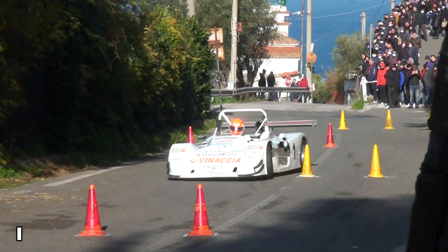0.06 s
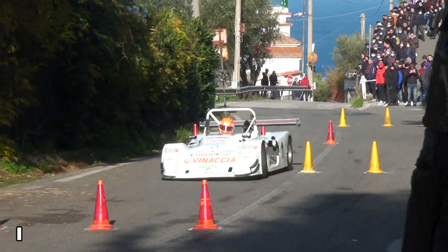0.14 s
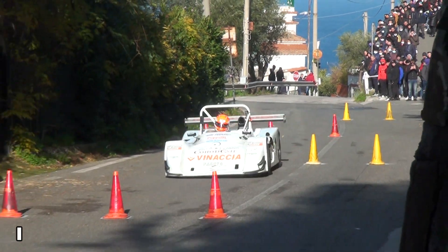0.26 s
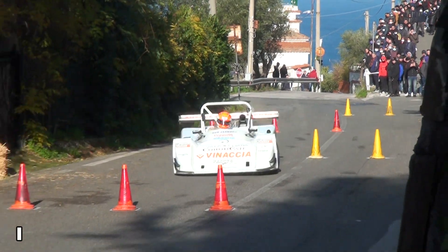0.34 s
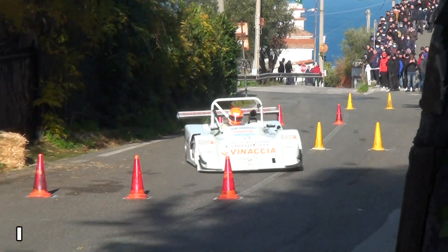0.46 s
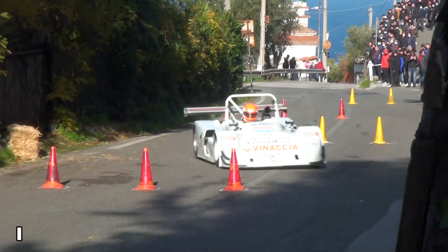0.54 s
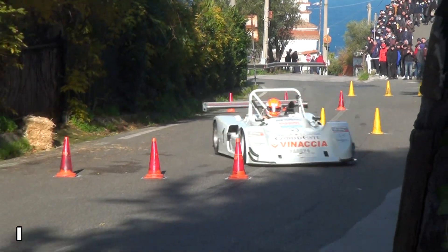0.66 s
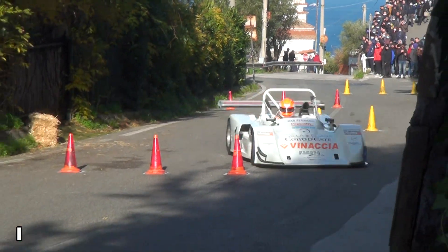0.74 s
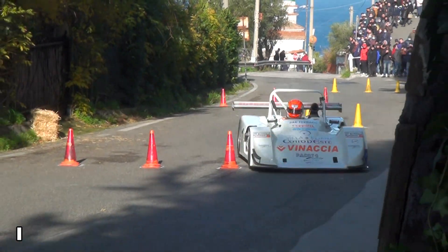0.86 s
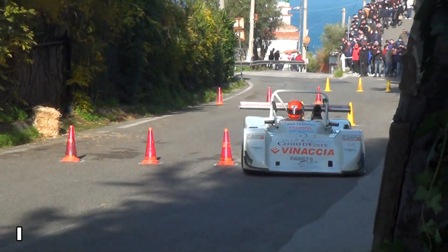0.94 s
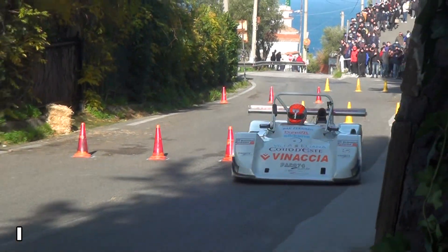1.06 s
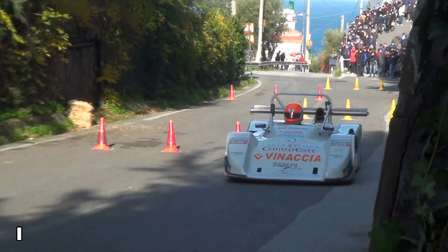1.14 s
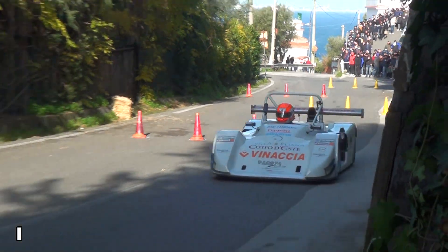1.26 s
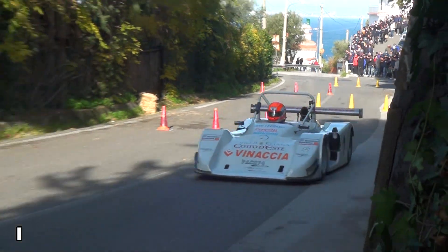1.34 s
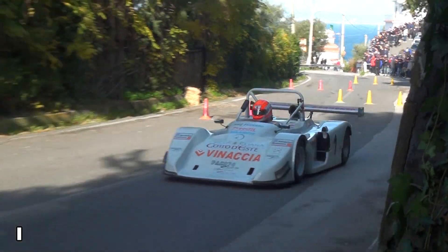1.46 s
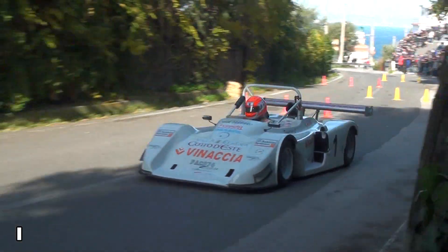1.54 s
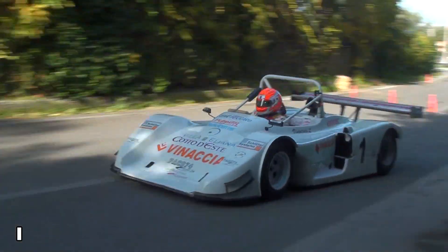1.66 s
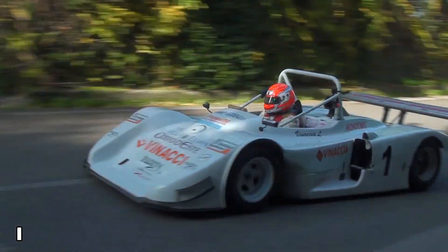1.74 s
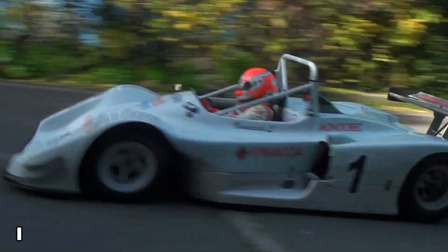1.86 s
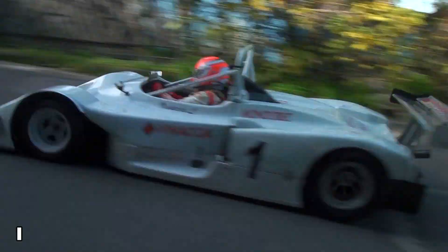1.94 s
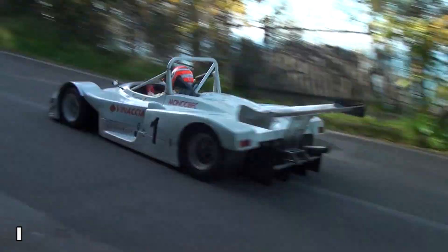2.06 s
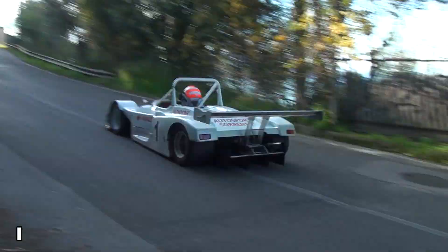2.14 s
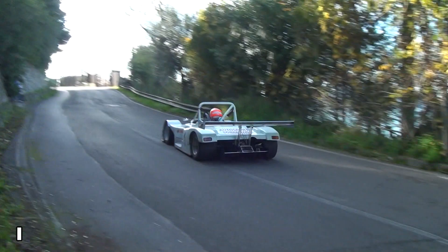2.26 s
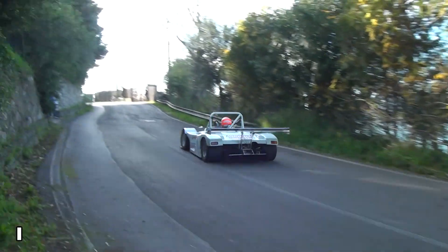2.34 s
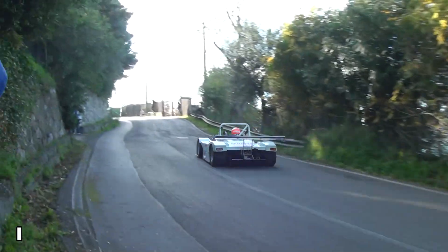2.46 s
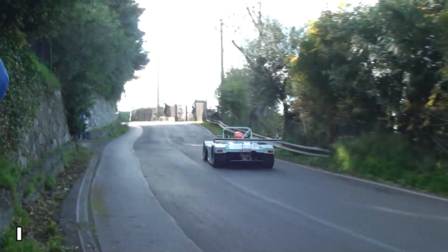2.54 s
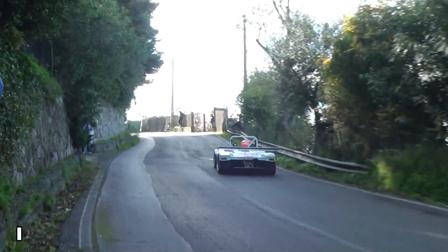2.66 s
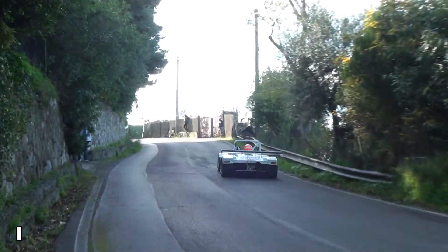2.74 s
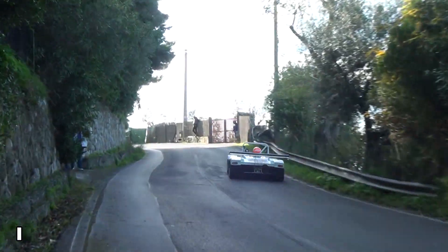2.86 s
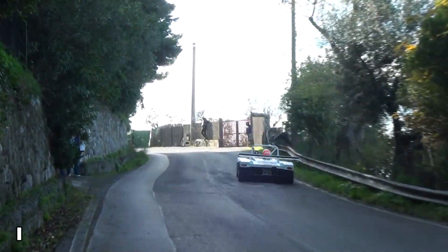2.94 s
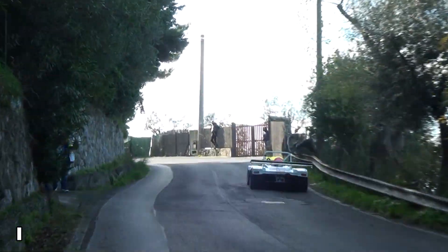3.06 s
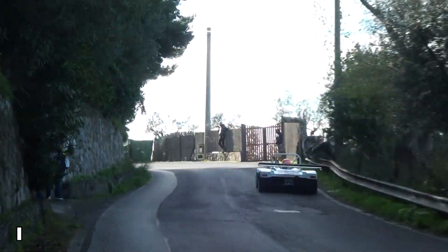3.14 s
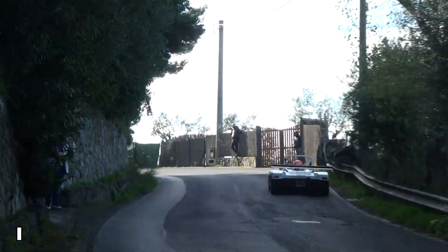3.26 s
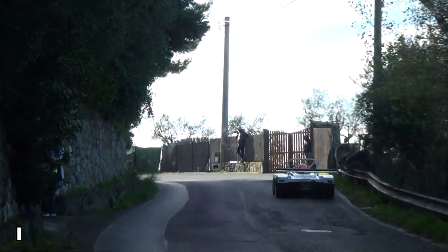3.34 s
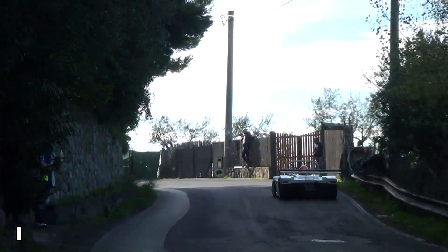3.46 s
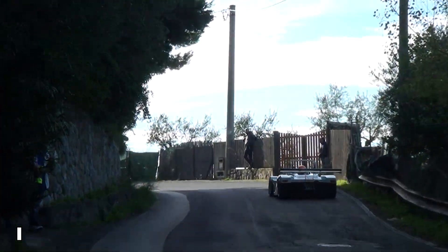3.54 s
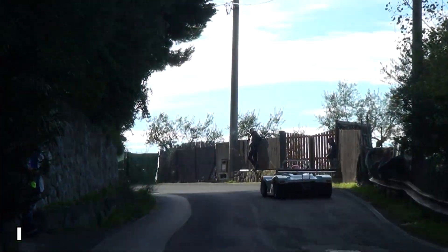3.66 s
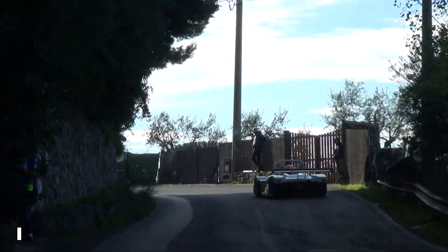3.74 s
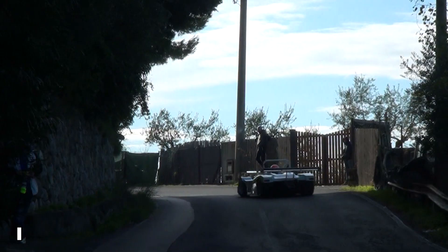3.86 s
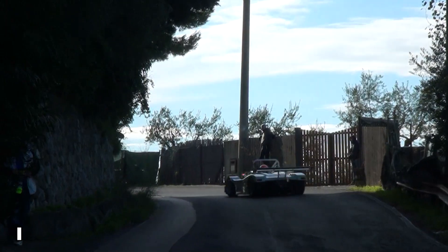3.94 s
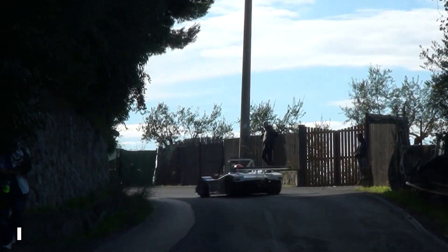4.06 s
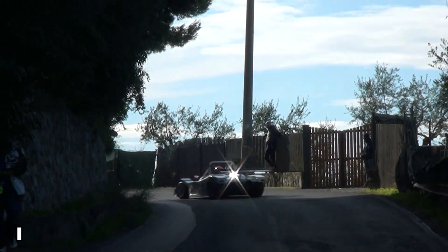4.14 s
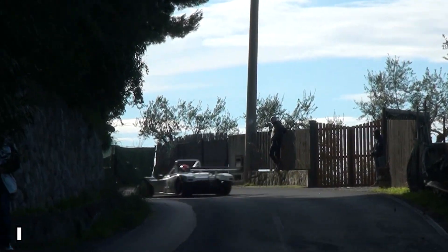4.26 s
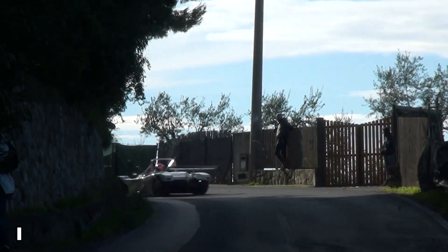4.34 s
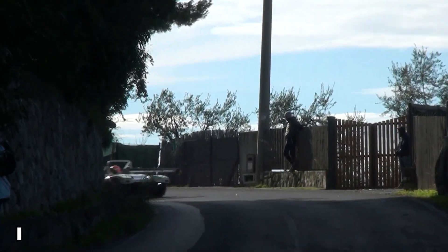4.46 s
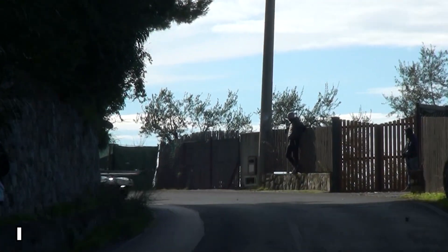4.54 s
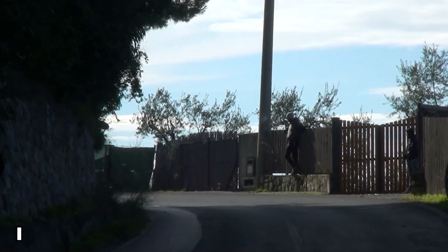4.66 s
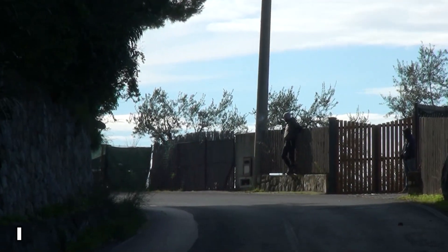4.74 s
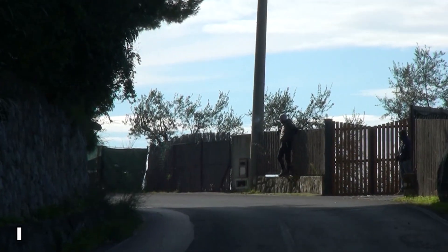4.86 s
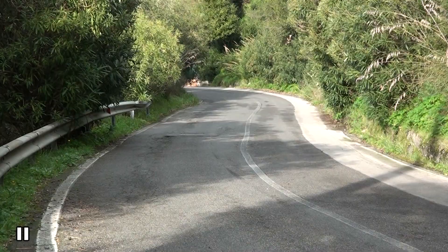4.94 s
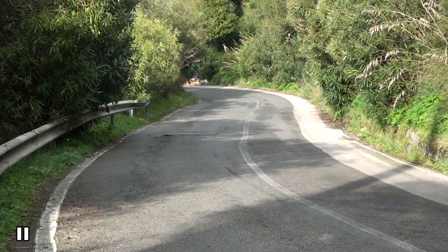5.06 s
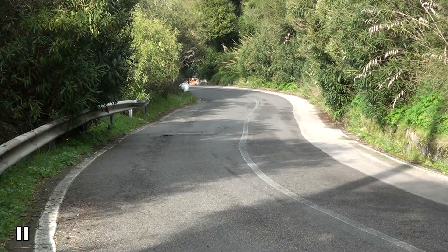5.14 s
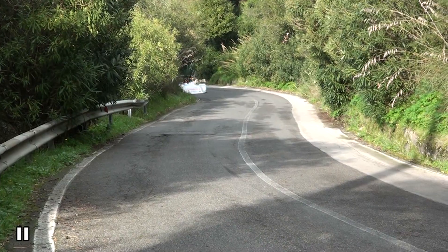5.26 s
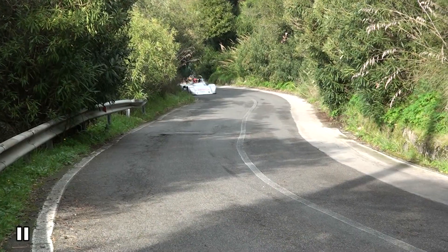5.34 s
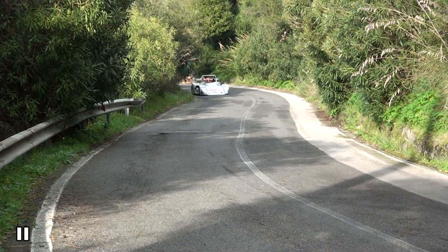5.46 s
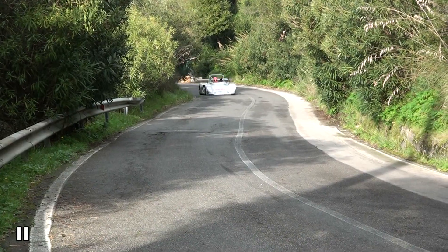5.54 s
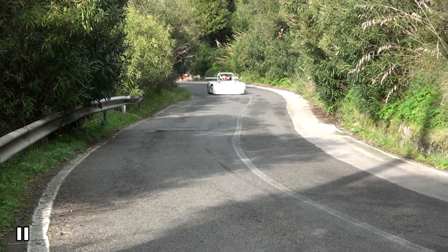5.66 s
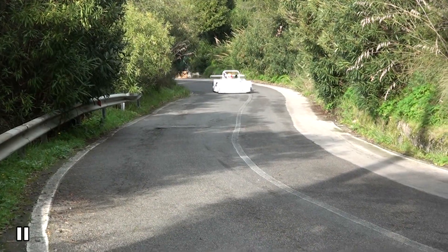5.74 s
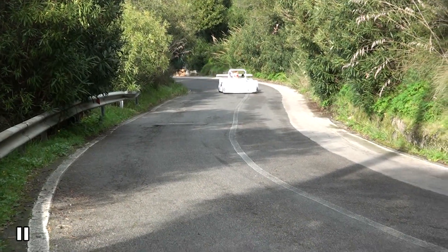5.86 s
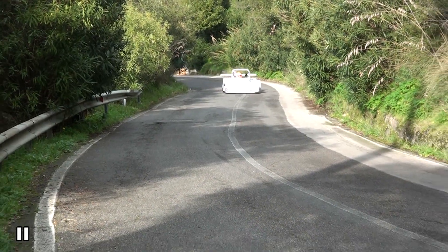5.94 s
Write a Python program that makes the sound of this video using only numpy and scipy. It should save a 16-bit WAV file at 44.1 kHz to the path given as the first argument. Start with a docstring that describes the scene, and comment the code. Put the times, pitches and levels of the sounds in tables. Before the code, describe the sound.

A hill-climb racing car is heard outdoors from the roadside. From 0 to 0.9 s it approaches, its four-cylinder note burbling and wavering around a middling pitch, with faint straight-cut gear whine, low gusty thuds and wall echoes. From about 0.9 s the revs climb steadily, growing louder and raspier, until it roars by at 2.2 s, very close and overloading the microphone. The pitch drops sharply, a brief low wake buffet follows at 2.3 s, and the exhaust pulls away with a hollow, brassy howl, rising until 3 s. Then it wavers and falls; booming backfires and sharp cracks burst around 3.4-3.6, 3.9 and 4.1 s, with smaller pops to 4.7 s as throttle blips fade round the bend. At 4.95 s an abrupt cut: a distant, thinner engine at much higher revs, fluttering and echoing, dipping near 5.4 s and rising again until 6 s.

```python
"""A four-cylinder hill-climb racer comes on weaving, its gears whining, and roars past within a few metres.
As it passes it buffets and overloads the microphone; then it lifts off, backfires and pulls away round a bend.
The scene jumps to a far stretch of road, where the car comes on at high revs.
Note, burble and pressure fronts follow one crankshaft phase; gas noise puffs with it; walls and banks echo."""
import sys
import numpy as np
from scipy import signal
from scipy.fft import rfft, irfft, next_fast_len
from scipy.io import wavfile
from scipy.ndimage import uniform_filter1d

SR = 44100
rng = np.random.default_rng(int(sys.argv[2]) if len(sys.argv) > 2 else 0)


def file_out(sig):
    """Save sig as 16-bit WAV at sys.argv[1]."""
    # one column per channel
    cols = np.atleast_2d(sig).T
    # limit, then scale
    lim = np.clip(cols, -1, 1)
    pcm = np.round(lim * 32767).astype(np.int16)
    wavfile.write(sys.argv[1], SR, pcm)


N = 265041
TIME = np.arange(N) / SR   # s
BINS = np.maximum(np.fft.rfftfreq(next_fast_len(N, True), 1 / SR), 1)   # Hz
JUMP_S = 4.949   # moment at which the scene jumps to the far stretch of road


def from_db(db):
    """Decibels to gain."""
    return 10 ** (np.asarray(db) / 20)


def rms_one(x):
    """Scale to unit power."""
    return x / np.sqrt(np.mean(x ** 2) + 1e-20)


def in_time(rows):
    """Each column of a curve table, sample by sample."""
    s, *columns = np.transpose(rows)
    return np.array([np.interp(TIME, s, c) for c in columns])


def across_jump(near, far):
    """The near stretch of road, then within milliseconds the far one."""
    share = np.clip((TIME - JUMP_S) / .004 + .5, 0, 1)
    return (1 - share) * near + share * far


def at_hz(points, hz):
    """Read a table on a log-frequency axis."""
    f, value = np.transpose(points)
    return np.interp(np.log(hz), np.log(f), value)


def colour(points, hz):
    """Gain of a spectrum that falls 30 dB per octave beyond its ends."""
    beyond = np.abs(np.log2(hz / np.clip(hz, points[0][0], points[-1][0])))
    return from_db(at_hz(points, hz) - 30 * beyond)


def filtered(x, response):
    """Apply a frequency response."""
    size = next_fast_len(N, True)
    return irfft(rfft(x, size) * response, size)[..., :N]


def drift(rate_hz):
    """Smooth random wander of about unit rms, drawn at every 40th sample; a higher rate wanders faster."""
    step = 40
    r = np.exp(-2 * np.pi * rate_hz * step / SR)
    settle = 2000   # drop the filter's start
    slow = signal.lfilter([1], [1, -2 * r, r * r], rng.standard_normal(N // step + settle + 2))[settle:]
    return np.interp(np.arange(N) / step, np.arange(len(slow)), rms_one(slow))


# Left-right likeness of the noise. Each row: frequency in Hz, correlation 0-1.
LIKENESS = [(40, 0), (250, 0.98), (700, 1), (1500, 1), (3000, 1), (7000, 0.9), (15000, 0.96)]


def turbulence(spectrum, gate=1):
    """Gas rushing unsteadily: gated stereo noise of a given colour and unit power, its sides alike by frequency."""
    alike = np.clip(at_hz(LIKENESS, BINS), 0, 1)
    noise = gate * rng.standard_normal((2, N))
    mid, side = filtered(noise, colour(spectrum, BINS) * np.sqrt([1 + alike, 1 - alike]))
    return rms_one(np.array([mid + side, mid - side]))


# Side of the car turned to the microphone. Each row: time in seconds, side (0 nose, 1 front corner, 2 flank,
# 3 rear corner, 4 tail, 5 rear quarter in the bend; more counts as 5).
ASPECT = [(0, 0), (1.15, 0.45), (1.45, 1), (1.8, 1.1), (1.9, 1.5), (2.0, 2.5), (2.19, 2), (2.26, 3),
          (2.36, 3), (2.55, 3.5), (2.85, 4), (3.6, 4), (4.15, 5), (4.94, 8)]


def side_shown():
    """From nose 0 to rear quarter 5; on the far stretch the car comes nose first."""
    return across_jump(np.clip(in_time(ASPECT)[0], 0, 5), 0)


# How each layer carries. Each entry: base level in dB at the nearest point, power of distance by which it falls,
# extra dB behind the car, base level in dB on the far stretch, its rise there in dB per second.
CARRY = { "note": (1, 1.2568, 0.5, -10.5, -1.5), "burble": (-9, 1.23, -1, -21, 5),
         "rasp": (-6, 1.5764, 2, -19.5, -0.5), "hiss": (-7.5, 2, 1.5, -38.5, 8.5),
         "fizz": (-19.5, 2.5, 0.5, -62.5, 0.5), "rumble": (-22, 3, -12.5, -42, -10.5), }
PASS_S, SPEED_M_PER_S, NEAREST_M = 2.231, 18.34, 6.64   # moment of nearest approach, road speed, distance then


def carried_db(layer):
    """A layer swells and fades with the distance of the passing car; on the far stretch it drifts steadily."""
    nearest_db, falloff, behind_db, far_db, rise_db_per_s = CARRY[layer]
    distance_m = np.hypot(NEAREST_M, SPEED_M_PER_S * (TIME - PASS_S))
    near_db = nearest_db - falloff * 20 * np.log10(distance_m / NEAREST_M)
    near_db = near_db + behind_db * np.clip(side_shown() - 3, 0, 1)
    return across_jump(near_db, far_db + rise_db_per_s * (TIME - JUMP_S))


# Throttle moves, with low wind gusts and thuds at the same moments. Each row: start and end of the hold in seconds,
# then the change in dB of the note, of the gas noise, of uneven firing, of the gusts and thuds.
MOVES = [(0, 0.124, 2, -1, 8, 46.5), (0.182, 0.284, -2.5, 0.5, 1, 21.5), (0.313, 0.573, -1, 2.5, 3.5, 25),
         (0.63, 0.869, -0.5, -1.5, -0.5, 9), (0.928, 1.213, 1.5, 3, -8, -17),
         (1.365, 1.76, -2.5, -1, -5.5, -18), (1.899, 2.186, 7.5, 4, -3, 10.5),
         (2.273, 2.287, 4.5, -6.5, -8.5, -11), (2.345, 2.586, 7, 3, -3.5, -6),
         (2.624, 3.005, 5.5, 1, -0.5, -4), (3.072, 3.116, -0.5, 1, 3.5, 16), (3.277, 3.523, 0, -1, -11, 17),
         (3.555, 3.596, -4, 5, 1, 4), (3.66, 3.88, -3.5, 2.5, -16, -13), (3.926, 3.93, -9, 3.5, 0, 25),
         (3.96, 4.143, -8, -2, -1, 19), (4.294, 4.414, -3.5, -2, -0.5, -12), (4.511, 4.562, 3.5, 5, -3, -3),
         (4.613, 4.666, 4, 11.5, -4, -1), (4.715, 4.73, 1.5, 3.5, -3, 0), (4.781, 4.95, -5, 1.5, -3, 0),
         (4.951, 5.041, 2, -1.5, -9, 0.5), (5.11, 5.28, 1, 0.5, -6, 6), (5.347, 5.577, -5, 1, 0.5, 17.5),
         (5.65, 6.01, -2, 0.5, -8.5, 8)]
MOVE_S = 0.051   # time a change takes to set in or let go


def throttle_and_gusts():
    """Each change sets in, holds and lets go: dB of note, gas noise, uneven firing, and gusts and thuds."""
    out = 0
    for start, end, *change_db in MOVES:
        held = np.clip(1 + np.minimum(TIME - start, end - TIME) / MOVE_S, 0, 1)
        same_stretch = (TIME < JUMP_S) == (start < JUMP_S)
        out = out + np.outer(change_db, held * same_stretch)
    return out


# Engine speed on the near and the far stretch. Each row: time in seconds, firing rate in Hz with Doppler shift.
REVS = [(0, 169.6), (.12, 149.9), (.2, 155.5), (.42, 152.1), (.63, 155.9), (.88, 153.7), (.94, 177.7),
        (1.07, 172.1), (1.31, 189.9), (1.58, 225.6), (1.7, 229), (1.8, 246.4), (1.87, 258), (1.93, 254.9),
        (1.99, 264.3), (2.04, 277.4), (2.09, 264.3), (2.14, 261.1), (2.19, 276.1), (2.225, 270.5),
        (2.26, 244.6), (2.31, 226.7), (2.36, 226.4), (2.43, 220.2), (2.6, 236.2), (2.79, 244.2),
        (3.0, 256.2), (3.045, 248.2), (3.08, 226.1), (3.115, 222), (3.19, 253.6), (3.34, 221.9),
        (3.57, 229.4), (3.67, 204), (3.85, 178.2), (3.9, 191.2), (4.11, 189), (4.21, 208.4), (4.38, 194.9),
        (4.56, 202.3), (4.69, 213.5), (4.77, 202.6), (4.94, 207)]
FAR_REVS = [(4.95, 311), (5.04, 300.9), (5.1, 310.7), (5.17, 294.7), (5.23, 288.4), (5.27, 298.6),
            (5.31, 299.7), (5.37, 278.8), (5.5, 283.7), (5.63, 294), (5.7, 310), (5.74, 295), (5.8, 302.7),
            (5.9, 292.3), (6.01, 311)]


def crankshaft(jitter_rad=.045):
    """Firing rate in Hz and the slightly jittery phase, one turn a firing, that every engine layer follows."""
    firing_hz = across_jump(in_time(REVS)[0], in_time(FAR_REVS)[0])
    return firing_hz, 2 * np.pi * np.cumsum(firing_hz) / SR + jitter_rad * drift(69)


def roadside(x, fade_s=0.23, dull_hz=2500):
    """Walls, trees and banks scatter a short dull tail, different at either side."""
    age = np.arange(SR // 4) / SR
    # falls 30 dB in fade_s and starts after 6 ms
    tail = rng.standard_normal((2, len(age))) * from_db(-30 * age / fade_s) * (age > .006)
    tail = tail / np.sqrt(np.sum(tail ** 2, axis=1, keepdims=True))
    return filtered(x, rfft(tail, next_fast_len(N, True)) / np.sqrt(1 + (BINS / dull_hz) ** 4))


# Colour of the echo from the wall and gate at the bend. Each row: frequency in Hz, gain in dB.
GATE_COLOUR = [(700, -15), (1100, -6), (1550, -4), (2400, -15)]
GATE_AT_S, GATE_SPREAD_S = 3.39, 0.12   # when it is strongest, spread of its bell-shaped swell
GATE_DELAY_S, GATE_CLOSING_S_PER_S = .195, 0.069   # its delay then, and how fast that shrinks


def gate_echo(x):
    """The wall ahead returns the upper partials late, and sharp, because the car is closing on it."""
    delay_s = GATE_DELAY_S - GATE_CLOSING_S_PER_S * (TIME - GATE_AT_S)
    late = np.interp(TIME - delay_s, TIME, filtered(x.mean(axis=0), colour(GATE_COLOUR, BINS)))
    return late * np.exp(-.5 * ((TIME - GATE_AT_S) / GATE_SPREAD_S) ** 2)


# Strength of the walls' returns together. Each row: time in seconds, gain in dB.
WALL_ECHO = [(0, -4.5), (.3, -10.5), (.8, -12), (.97, -1.5), (1.3, -7), (1.5, -12), (1.8, -18),
             (2.3, -32.5), (4.9, -29), (5.0, -14.5), (5.25, -5.5), (5.42, -3.5), (5.58, 2.5), (5.68, -13),
             (5.82, -11.5), (6.01, -17)]
# The single returns. Each row: pitch as a share of the car's own on the near stretch, the same on the far stretch,
# gain in dB.
RETURNS = [(.935, .85, -1.5), (0.96, 0.94, -7.5)]


def wall_echo(phase, firing_hz, order_db):
    """Returns from walls and banks at a lower Doppler pitch split the note's partials and beat with them."""
    out = 0
    for near, far, db in RETURNS:
        ratio = np.where(TIME < JUMP_S, near, far)
        out = out + from_db(db) * exhaust_note(ratio * phase, ratio * firing_hz, order_db, 0)
    return from_db(in_time(WALL_ECHO)[0]) * out


# The car's wake buffets the microphone. Each row: time in seconds, level in dB, bell-shaped spread in seconds,
# frequency in Hz.
WAKE = [(2.33, 2.5, 0.0061, 40.7)]


def wake():
    """A brief swing of air pressure just behind the car."""
    out = 0
    for s, db, spread_s, hz in WAKE:
        age = TIME - s
        out = out + from_db(db) * np.exp(-.5 * (age / spread_s) ** 2) * np.sin(2 * np.pi * hz * age)
    return out


# Colour of the low gusts and thuds. Each row: frequency in Hz, relative level in dB.
RUMBLE = [(12, -9), (30, -4), (60, 10), (100, -2), (160, 6.5), (300, -40.5)]


def rumble(gust_db):
    """Low wind gusts and thuds: deep noise that swells with the gusts and the distance."""
    return from_db(carried_db("rumble") + gust_db) * turbulence(RUMBLE)


# Whine of the straight-cut gears, heard from the front. Each row: time in seconds, level in dB.
WHINE_DB = [(0, -54), (.2, -37), (.6, -37), (.75, -44), (1.15, -33), (1.7, -60), (2.5, -82)]


def gear_whine(phase, teeth_per_firing=21.0, wander_rad=1.4):
    """Gear teeth mesh in step with the crankshaft."""
    return from_db(in_time(WHINE_DB)[0]) * np.cos(teeth_per_firing * phase + wander_rad * drift(29))


# Booming backfires. Each row: start in seconds, level in dB, ring in Hz, time in seconds for the blast to fall 35 dB.
BACKFIRES = [(3.427, 1, 690, 0.14), (3.45, -7, 800, 0.057), (3.552, 1, 690, 0.075), (3.583, -9, 800, 0.016),
             (3.601, -18, 780, 0.16), (3.625, -5, 720, 0.041), (3.896, 4, 587.8, 0.034),
             (3.922, -2, 417, 0.024), (4.082, -10.5, 1086, 0.045), (4.108, -12.5, 1022, 0.024),
             (4.145, -15, 700.2, 0.069), (4.16, -11.5, 645, 0.045), (4.179, -12, 760, 0.05),
             (4.416, -16, 800, 0.033)]
# Sharp cracks. Each row: start in seconds, peak in dB.
CRACKS = [(3.556, -5), (3.581, -6.5), (3.621, -8.5), (3.899, -8), (3.961, -12.5), (4.083, -12), (4.11, -29),
          (4.163, -30), (4.345, -20.5), (4.42, -27), (4.65, -17.5), (4.665, -13), (4.684, -11)]


def backfires(body_db=-10.0, body_hz=900, ring_width_hz=340, crack_hz=4500, crack_s=0.012):
    """Unburnt fuel goes off in the pipe: rushes of gas boom at the pipe's pitch, and sharp cracks join them."""
    out, age = np.zeros((2, N)), np.arange(SR // 10) / SR
    body_band = signal.butter(2, [45, body_hz], "band", fs=SR, output="sos")
    crack_band = signal.butter(2, [1000, crack_hz], "band", fs=SR, output="sos")
    r = np.exp(-np.pi * ring_width_hz / SR)
    for s, db, hz, length in BACKFIRES:
        blast = rng.standard_normal(len(age)) * from_db(-35 * age / length)
        body = signal.sosfilt(body_band, blast)
        boom = signal.lfilter([1, 0, -1], [1, -2 * r * np.cos(2 * np.pi * hz / SR), r * r], body)
        bang = boom / np.abs(boom).max() + from_db(body_db) * body / np.abs(body).max()
        start = round(s * SR)
        out[:, start:start + len(age)] += from_db(db) * bang
    for s, db in CRACKS:
        blast = rng.standard_normal(len(age)) * from_db(-20 * age / crack_s)
        crack = signal.sosfilt(crack_band, blast)
        start = round(s * SR)
        out[:, start:start + len(age)] += from_db(db) * crack / np.abs(crack).max()
    return out


# Colour of the finest treble. Each row: frequency in Hz, relative level in dB.
FIZZ = [(6500, -12), (8300, 3.5), (11000, 8), (13000, 1), (16000, -22.5)]


def fizz(puff):
    """The thin top of the gas rush, noise puffing with the firings."""
    return from_db(carried_db("fizz")) * turbulence(FIZZ, puff)


# Colour of the burble. Each row: frequency in Hz, relative level in dB.
BURBLE = [(120, -48), (200, -1), (270, -3.5), (400, -8.5), (520, -2), (720, 0.5), (950, -12), (1300, -13.5),
          (1700, -39.5)]


def burble(phase, firing_hz, line_db=-1.5, noise_db=-3.0, half_db=1.5, unsteady_db=5):
    """Four unequal cylinders add lines at quarters of the firing rate, and no two cycles burn alike."""
    lines = 0
    for k in range(3, 24):
        if k % 4:   # whole multiples belong to the note
            level = from_db(unsteady_db * drift(6.2) + half_db * (k % 2 == 0))
            lines = lines + level * colour(BURBLE, k * firing_hz / 4) * np.cos(k * phase / 4 + drift(7))
    return from_db(line_db) * rms_one(lines) + from_db(noise_db) * turbulence(BURBLE)


def puffs(phase, facing, depth=0.29):
    """Gas leaves in one puff a firing; scattered sound loses that rhythm."""
    puff = np.exp(depth * facing * np.cos(phase))
    return puff / np.sqrt(uniform_filter1d(puff ** 2, size=2000))


def firing_strength(phase, spread_db=2.4):
    """Every firing has a strength of its own."""
    turns = phase / (2 * np.pi)
    strengths = rng.standard_normal(2000)
    return rms_one(from_db(spread_db * np.interp(turns, np.arange(len(strengths)), strengths)))


def pulses(phase, firing_hz, spectrum, tilt_db, scatter_rad=0.82, count=32, patchy_db=4.2):
    """Steep pressure fronts, one a firing: the upper partials, shifted about by ground reflections."""
    out, gains = 0, colour(spectrum, BINS)
    for k in range(7, count):
        level_db = tilt_db * np.log2(k * firing_hz / 1800) + patchy_db * drift(5.9)
        level = np.interp(k * firing_hz, BINS, gains) * from_db(level_db)
        out = out + level * np.cos(k * phase + scatter_rad * drift(14.6))
    return out / np.sqrt(uniform_filter1d(out ** 2, size=3000) + 1e-12)


# Colours of the gas noise, middle and treble. Each row: frequency in Hz, relative level in dB.
RASP = [(900, 1), (1250, -2), (1600, 1), (2000, -2), (2500, -3), (3300, -9), (4200, -13)]
HISS = [(2700, 4.5), (3600, 5), (5000, 3.5), (6500, 2), (8000, -3.5), (10000, -90)]
# Share of the rasp that comes as clean pressure fronts. Each row: side as in ASPECT, share 0-1 before the throttle acts.
BRASSY_BY_SIDE = [(0, .06), (1, .1), (1.5, .4), (2, .62), (3, .66), (4, .62), (5, .62)]
FAR_BRASSY, BRASSY_PER_GAS_DB = .07, .04   # share afar; in the bend an open throttle makes cleaner fronts
TILT_DB_PER_OCTAVE, TILT_PER_NOTE_DB = 2, -0.53   # slope of the upper partials, which turn dull as the note swells
BEND_HISS_DB, BEND_TILT_DB_PER_OCTAVE = -1.5, -5.5   # the bank in the bend screens the treble
RASP_PER_NOTE_DB = 0.0949   # the rasp swells with the throttle


def exhaust_gas(phase, firing_hz, puff, side, load_db, gas_db, hiss_tonal_share=0.28):
    """In line with the pipe the treble is partly a train of fronts, elsewhere mostly a wash of turbulence."""
    in_bend = np.clip(side - 4, 0, 1)
    tilt_db = TILT_DB_PER_OCTAVE + TILT_PER_NOTE_DB * load_db + BEND_TILT_DB_PER_OCTAVE * in_bend
    near_brassy = np.interp(side, *np.transpose(BRASSY_BY_SIDE)) + BRASSY_PER_GAS_DB * gas_db * in_bend
    brassy = across_jump(np.clip(near_brassy, 0, .9), FAR_BRASSY)
    tonal = np.clip(hiss_tonal_share * brassy, 0, 1)

    def blend(spectrum, share):
        """Cross-fade fronts and wash by power."""
        fronts = pulses(phase, firing_hz, spectrum, tilt_db)
        return np.sqrt(share) * fronts + np.sqrt(1 - share) * turbulence(spectrum, puff)

    rasp = from_db(carried_db("rasp") + RASP_PER_NOTE_DB * load_db) * blend(RASP, brassy)
    hiss = from_db(carried_db("hiss") + BEND_HISS_DB * in_bend) * blend(HISS, tonal)
    return (rasp + hiss) * firing_strength(phase)


# Resonances that colour the note, seen from each side, the rear corner being just after the pass, where the firing
# note booms almost alone, and the tail where the pipe howls near 490 Hz.
# Each row: frequency in Hz, base level in dB of a partial at the nearest point (for AFAR, on the far stretch).
NOSE = [(155, -3.5), (175, -29.5), (230, -18.5), (305, -9), (345, -3), (460, -9.5), (550, -13), (612, -2),
        (700, -7), (780, -12.5), (1200, -29), (1600, -56)]
FRONT_CORNER = [(185, -6), (210, -4), (240, -3), (350, -6), (430, -13.5), (470, -3), (520, -10), (580, -5),
                (640, -4), (710, -11.5), (850, -13), (1100, -26.5), (1280, -22), (1400, -20), (1520, -17)]
FLANK = [(250, -8), (268, -15), (520, -11), (790, -8.5), (1000, -22), (1070, -13.5), (1270, -13.5),
         (1350, -7), (1530, -12), (1640, -14)]
REAR_CORNER = [(220, -4.5), (245, -7.5), (450, -10), (490, -11.5), (665, -8), (720, -32), (900, -32.5),
               (1400, -24.5)]
TAIL = [(190, -0.5), (222, -17), (255, -20), (400, -6), (450, 5), (490, 9), (520, 6.5), (580, -2.5),
        (675, -3), (720, -8), (760, -9), (920, -10.5), (1000, -14), (1120, -17.5), (1240, -10.5),
        (1350, -17), (1500, -10)]
QUARTER = [(200, 0.5), (400, -4), (600, -9.5), (740, -3.5), (810, 1.5), (860, -7), (1010, -11),
           (1070, -18.5), (1200, -19.5), (1280, -21)]
AFAR = [(275, -1.5), (305, -17), (540, -11.5), (610, -9), (700, -9), (900, -14), (1220, -15.5), (1550, -23),
        (1800, -18.5)]
# The intake howls toward the front while the throttle is open. Each row: time in seconds, gain in dB at its pitch.
HOWL_DB = [(0, 0), (.15, 3.5), (.195, 12), (.33, 1), (.41, 6), (.48, -10), (.64, 10), (.74, 3.5), (.85, -6),
           (.97, 0), (1.2, -2), (4.95, 11), (5.1, 5.5), (5.2, 4.5), (5.3, 9), (5.36, 5.5), (5.6, 2.5),
           (5.66, 16.5), (5.8, 15), (6.01, 19.5)]
HOWL_HZ, HOWL_WIDTH_HZ = 583, 73   # centre and bell-shaped spread


def partial_db(hz, side):
    """A partial slides through the resonances of the side shown, and through the intake's howl."""
    sides = (NOSE, FRONT_CORNER, FLANK, REAR_CORNER, TAIL, QUARTER)
    near = sum(np.clip(1 - np.abs(side - k), 0, 1) * at_hz(points, hz) for k, points in enumerate(sides))
    bell = np.exp(-.5 * ((hz - HOWL_HZ) / HOWL_WIDTH_HZ) ** 2)
    howl = in_time(HOWL_DB)[0] * np.clip(1 - side, 0, 1) * bell
    return across_jump(near, at_hz(AFAR, hz)) + howl


# Colour of the note's second and third partials; it shifts during the weaving, then the last row holds.
# Each row: time in seconds, change in dB of the second partial, of the third.
LOW_PARTIALS_DB = [(0, 0, 3), (.2, -2, -6), (.5, 0.5, 7), (.66, -6, 0), (.8, 7.5, -14), (.95, -0.5, 1.5),
                   (1.1, -2, -4.5), (1.22, -2, 1.5), (1.5, -5.5, -0.5)]
STEEPEN_PER_GAS_DB = 1.0   # dB gained by the higher partials for each dB of gas noise


def partial_levels(firing_hz, side, gas_db, count):
    """Level of each low partial; in the bend an open throttle steepens the pulses and lifts the higher ones."""
    second_db, third_db = in_time(LOW_PARTIALS_DB)
    levels = []
    for k in range(1, count + 1):
        steepen = STEEPEN_PER_GAS_DB * np.clip(side - 4, 0, 1) * np.clip((k - 4) / 2, 0, 1)
        shift_db = (k == 2) * second_db + (k == 3) * third_db
        levels.append(partial_db(k * firing_hz, side) + steepen * gas_db + shift_db)
    return np.array(levels)


# Tailpipe resonances. Each row: frequency in Hz, width in Hz, relative strength in dB.
PIPE = [(222, 29.5, 6), (514.5, 28, 5.5), (800, 160, 8), (1556, 280, -10)]


def pipe_phase(hz):
    """Phase by which the tailpipe's resonances shift a partial."""
    return np.angle(sum(from_db(db) / (1 + 2j * (hz - f) / width) for f, width, db in PIPE))


def exhaust_note(phase, firing_hz, order_db, facing, flutter_db=1.46, flutter_rad=0.56):
    """The lowest multiples of the firing rate; they flutter more when they arrive by way of walls and trees."""
    out, shift = 0, np.unwrap(pipe_phase(BINS))
    for k, db in enumerate(order_db, 1):
        level = from_db(db + flutter_db * (2.0 - facing) * drift(11.1))
        wander = flutter_rad * (1 - facing) * drift(4.9)
        pipe_shift = np.interp(k * firing_hz, BINS, shift)
        out = out + np.sqrt(2) * level * np.cos(k * phase + pipe_shift + wander)
    return out


# Share of the sound that comes straight from the tailpipe. Each row: side as in ASPECT, share 0-1.
FACING_BY_SIDE = [(0, 0.06), (1, 0), (2, 0.29), (3, 0.44), (4, 0.5), (5, 0.55)]
# Bearing of the car. Each row: time in seconds, left minus right in dB.
BEARING = [(0, 2), (.8, 2.5), (1.3, 1.5), (1.8, 1.4), (3.2, 1.5), (4.9, -0.5), (5.0, -0.5), (6.01, -1)]


def scene(roadside_db=-7.5, count=6):
    """The engine's note, burble and gas noise all follow the one crankshaft, the throttle and the distance."""
    firing_hz, phase = crankshaft()
    load_db, gas_db, uneven_db, gust_db = throttle_and_gusts()
    side = side_shown()
    facing = np.clip(np.interp(side, *np.transpose(FACING_BY_SIDE)), 0, 1)
    puff = puffs(phase, facing)
    order_db = carried_db("note") + load_db + partial_levels(firing_hz, side, gas_db, count)
    note = exhaust_note(phase, firing_hz, order_db, facing)
    echo = wall_echo(phase, firing_hz, order_db)
    uneven = from_db(carried_db("burble") + uneven_db) * burble(phase, firing_hz)
    gas = exhaust_gas(phase, firing_hz, puff, side, load_db, gas_db)
    engine = note + echo + uneven + from_db(gas_db) * (gas + fizz(puff))
    sources = engine + rumble(gust_db) + gear_whine(phase) + backfires()
    # the more the pipe points away, the more is heard by reflection
    scattered = from_db(roadside_db) * roadside(sources * np.sqrt(1 - facing))
    panned = sources * from_db(in_time(BEARING) * [[.5], [-.5]])
    return panned + scattered + gate_echo(note + gas) + wake()


def record(dry, top=0.66, knee=7.2, port_lag_ms=0.051, widen_rad=0.033, widen_hz=1800, low_cut_hz=14):
    """The microphone overloads; its left port leads the right, and both ends of the range are cut."""
    clipped = dry / (1 + np.abs(dry / top) ** knee) ** (1 / knee)
    lead = 2 * np.pi * BINS * port_lag_ms / 1000
    lead = lead + widen_rad / (1 + (BINS / widen_hz) ** 2)   # a little extra lead in the lows
    response = np.exp(.5j * lead * [[1], [-1]]) / (1 + (low_cut_hz / BINS) ** 4)
    ports = filtered(clipped * np.minimum(TIME / 0.0026, 1), response)
    return signal.sosfilt(signal.cheby2(16, 70, 16300, fs=SR, output="sos"), ports)


dry = scene()
out = record(dry)
file_out(out)
```